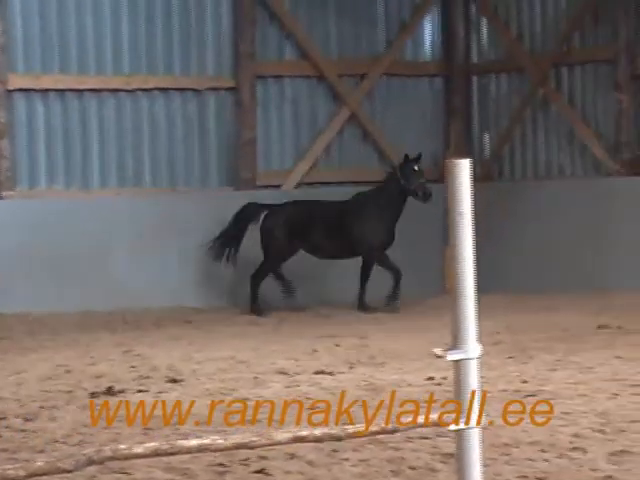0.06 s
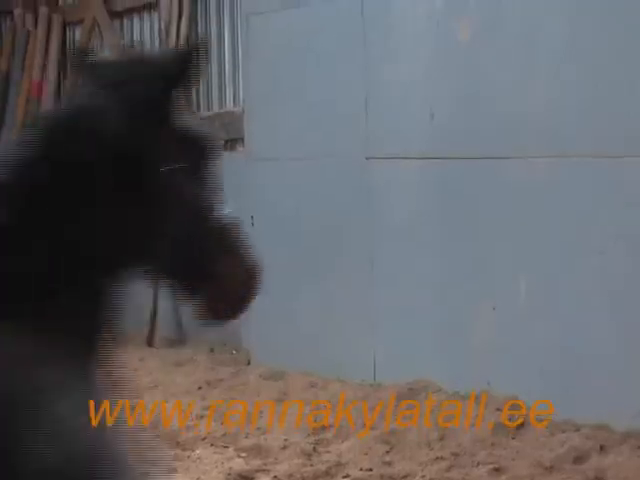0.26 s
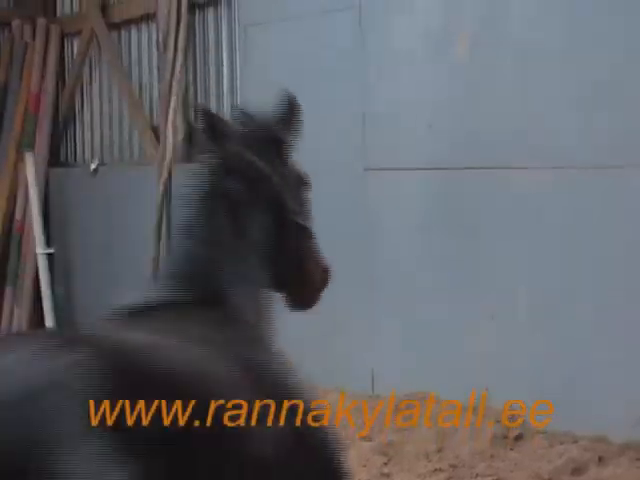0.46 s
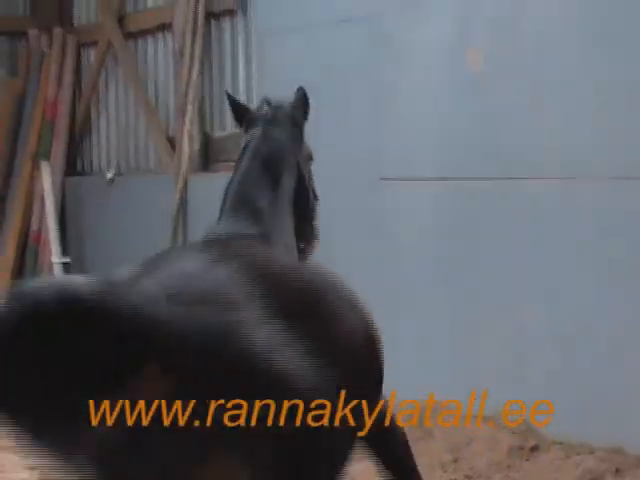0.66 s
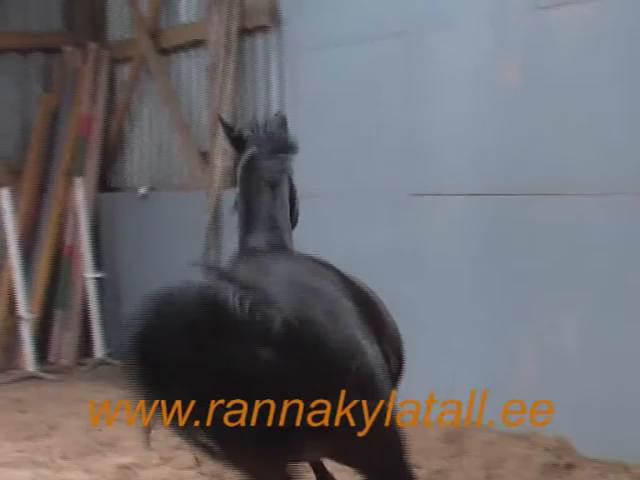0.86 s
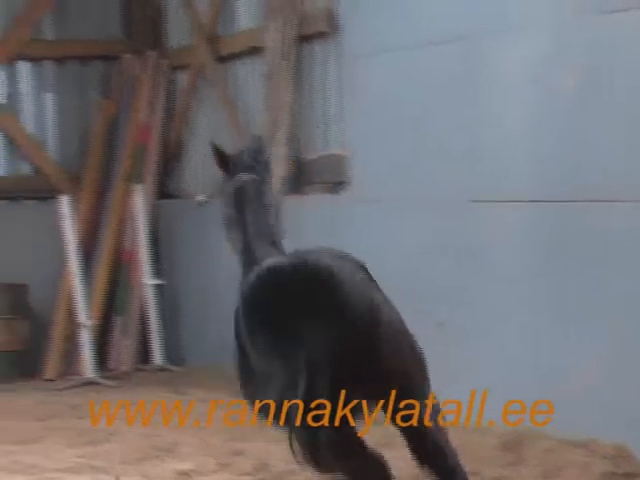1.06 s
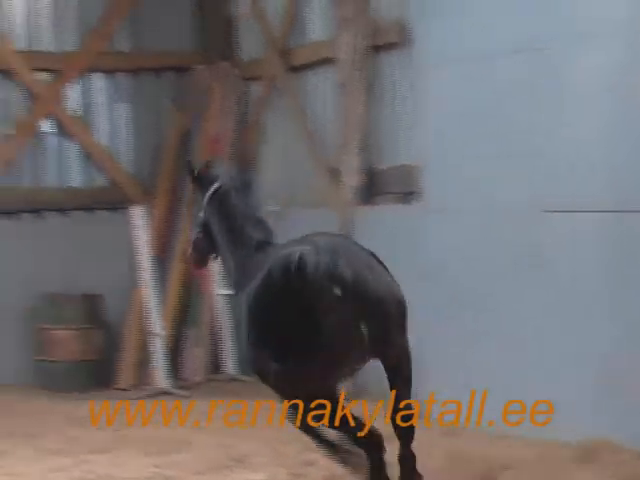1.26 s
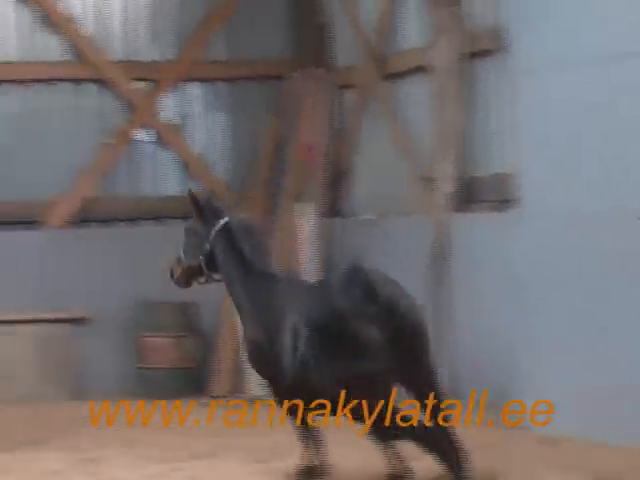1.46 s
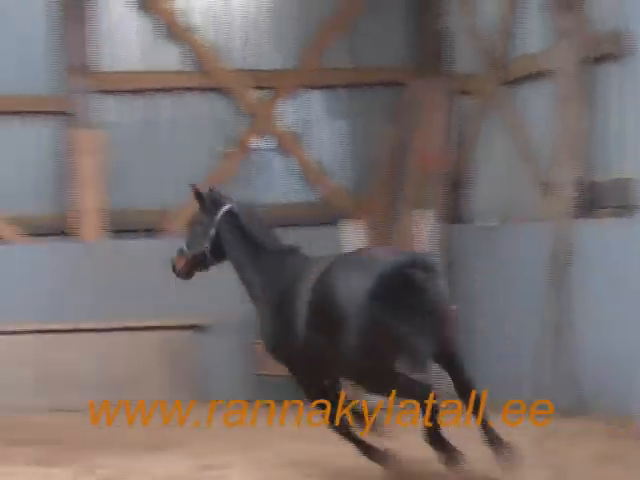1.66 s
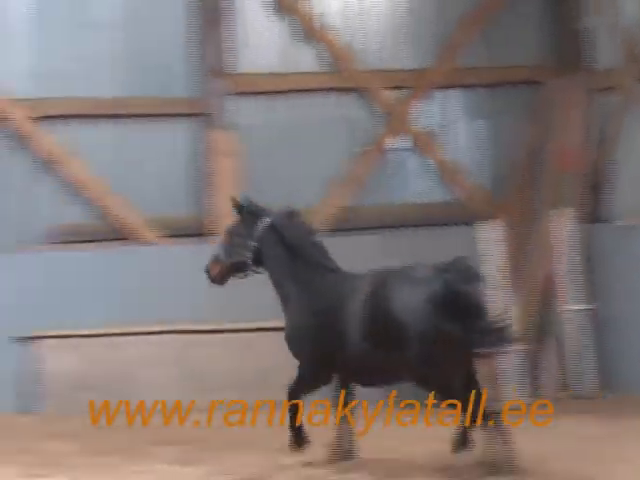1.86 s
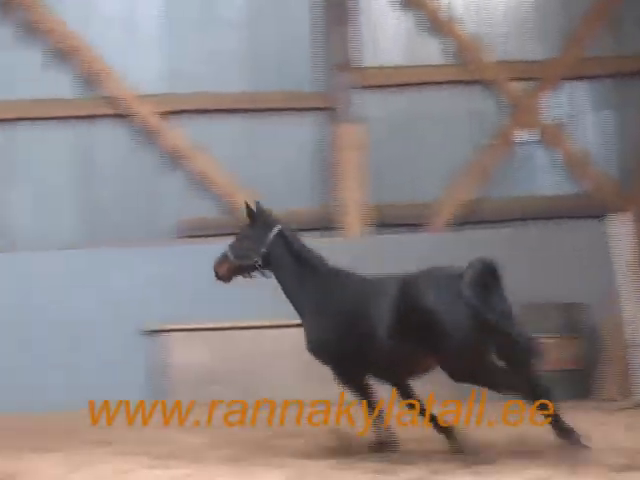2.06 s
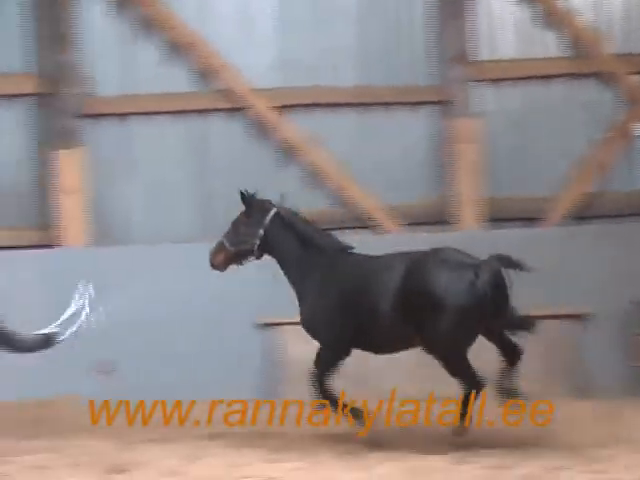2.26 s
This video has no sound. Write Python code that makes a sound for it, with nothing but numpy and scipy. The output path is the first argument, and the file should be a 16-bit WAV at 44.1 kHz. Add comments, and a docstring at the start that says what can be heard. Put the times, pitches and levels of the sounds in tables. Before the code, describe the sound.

Dull hoofbeats of a horse cantering past and away on sand in an echoing hall.

```python
"""A horse canters close by and away over the sand floor of a riding hall.
Each hoof thumps the ground, crunches into the sand and throws grit; a few knock on something hollow.
After a quiet moment the sound starts abruptly, with the horse blowing air out through its nostrils.
Thrown sand patters down, and there is one dry snap. The hall answers with a dull echo,
which makes up more of the sound as the horse moves off."""
import sys
import numpy as np
from scipy import signal
from scipy.io import wavfile

SR = 44100
rng = np.random.default_rng(int(sys.argv[2]) if len(sys.argv) > 2 else 0)


def master(y):
    """Save y as 16-bit WAV."""
    cut = np.clip(np.atleast_2d(y).T, -1, 1)
    pcm = np.round(cut * 32767)  # scale
    wavfile.write(sys.argv[1], SR, pcm.astype(np.int16))


N = 105840
TIME = np.arange(N) / SR
HIT_TIME = TIME[:SR // 3]  # the time axis of one short sound


def hoofbeats():
    """All the horse's steps, as two tracks: the ringing ground and the rustling sand."""
    # steps: t/s, boom/dB, thud/dB, thud pitch/Hz, clop/dB, crunch/dB, grit/dB, time to sink in/s
    steps = [(.005, -50.5, -63, 212, -81, -81, -77, .023), (.202, -51, -44, 317, -31.5, -30, -63, 0.018),
             (.253, -40, -37, 325, -29.5, -29, -66, 0.0046), (.332, -35, -56, 317, -48, -34, -44.5, 0.0085),
             (.347, -45, -45, 317, -28, -36, -60, 0.0016),
             (.397, -34, -28.5, 324, -19.5, -22, -45.5, 0.0045),
             (.484, -41, -25, 193, -63, -24, -39, .0081), (.509, -33, -28.5, 215, -45, -23.5, -48, 0.01),
             (.584, -34, -35, 217, -39, -32.5, -45.5, 0.005),
             (.599, -34, -36, 276, -56, -32.5, -44.5, 0.0086),
             (0.678, -50, -36, 211, -38, -34.5, -49.5, 0.022),
             (.769, -58, -41.5, 220, -44, -38.5, -49, 0.0089), (.914, -62, -39, 235, -43, -36, -65, 0.0068),
             (.939, -51, -42.5, 256, -58, -39.5, -74, 0.046),
             (.985, -38.5, -31, 249.5, -37, -29.5, -46.5, 0.011),
             (.998, -52, -37.5, 251, -42, -32, -53, 0.0042), (1.041, -37, -40, 343, -35, -39.5, -48, 0.016),
             (1.168, -36.5, -42, 213, -62, -41, -52, 0.021), (1.253, -44, -45, 332, -40.5, -42, -68, 0.01),
             (1.417, -32.5, -40, 208, -49, -33.5, -51, 0.013),
             (1.483, -37, -27.5, 206.6, -52, -34.5, -63, 0.022),
             (1.501, -23, -24, 232, -32, -34.5, -49.5, 0.01), (1.588, -29, -55, 218, -54, -50, -59, 0.045),
             (1.643, -32.5, -39.5, 305, -48, -57, -53.5, 0.0075),
             (1.672, -44, -41, 266, -46, -44.5, -68, 0.053),
             (1.755, -58, -41.5, 203, -49, -43, -62, 0.0095), (1.921, -50, -52, 210, -45, -49, -62, 0.0075),
             (1.984, -38, -32, 212.3, -42.5, -44, -58.5, 0.0043),
             (2.001, -35, -29.5, 213, -52, -37.5, -54, .025),
             (2.026, -33, -37.5, 225, -38.5, -37.5, -65, 0.059),
             (2.106, -33, -50, 242, -69, -49, -60, 0.012),
             (2.223, -50.5, -45.5, 274, -69, -59, -61, 0.0079), (2.29, -53, -48, 288, -51, -46, -52, 0.034)]
    ground, sand = np.zeros((2, N))
    for s, boom_db, thud_db, thud_hz, clop_db, crunch_db, grit_db, sink_s in steps:
        add(sand, s, amp(crunch_db) * sand_crunch(sink_s))
        add(ground, s, hoof_thump(boom_db, thud_db, thud_hz, clop_db))
        add(sand, s, amp(grit_db) * loose_grit(sink_s))
    return ground, sand


def hoof_thump(boom_db, thud_db, thud_hz, clop_db):
    """A hoof sets the ground ringing: a deep boom, a thud and a hollow clop."""
    # the ground's deep tones: f/Hz, level/dB, time to fade by 60 dB/s
    boom_tones = [(63, -15, 0.39), (98.1, 9, 0.13), (118, -19, 0.056)]
    # the thud's tones: multiple of its pitch, level/dB, time to fade by 60 dB/s
    thud_tones = [(1.001, 8.5, 0.089), (1.22, -3, 0.091)]
    # the clop's tones, retuned a little for each step: f/Hz, level/dB, time to fade by 60 dB/s
    clop_tones = [(349, 6.5, 0.068), (533, 3.5, .11), (770.4, -2, 0.08)]
    boom = ring(boom_tones, rise_s=0.0072)
    thud = ring([(thud_hz * multiple, db, fade_s) for multiple, db, fade_s in thud_tones], rise_s=0.0031)
    retuned = [(hz * (1 + .1 * rng.uniform(-1.05, 1)), db, fade_s) for hz, db, fade_s in clop_tones]
    clop = ring(retuned, rise_s=0.0034)
    return amp(boom_db) * boom + amp(thud_db) * thud - amp(clop_db) * clop


def sand_crunch(sink_s):
    """Packed sand gives way under a hoof; the quicker the landing, the harder it slaps."""
    # tone of packed sand: f/Hz, level/dB
    spectrum = [(30, -53.5), (70, 6.5), (105, -1.5), (155, -8.5), (280, -1), (420, 5.5), (1050, -1.5),
                (1500, -6.5), (2300, -11), (3800, -28.5), (8000, -41), (16000, -58)]
    crush = burst(sink_s, per_s=3500)
    slap = 1.3 * np.exp(-sink_s / 0.0083) * np.linalg.norm(crush) * (HIT_TIME == 0)
    return sized(colour(crush - slap, spectrum))


def loose_grit(sink_s):
    """Grit thrown by a hoof, brighter and longer than the crunch."""
    # tone of loose grit: f/Hz, level/dB
    spectrum = [(200, -45), (1200, -16), (2800, 7.5), (4500, 0), (6800, -5.5), (9000, -7), (12000, -17),
                (16000, -27)]
    return sized(colour(burst(sink_s * 1.9, per_s=3500), spectrum))


def hoof_knocks():
    """A hoof knocks on something hard and hollow, which rings briefly."""
    # knocks: t/s, level/dB
    knocks = [(.992, -32), (1.4199, -30), (1.4345, -37.5)]
    # the hollow thing's tones: f/Hz, level/dB, time to fade by 60 dB/s
    tones = [(530, 6.5, 0.038), (644, 2, 0.061), (1033, -1, 0.078), (1125, -7, 0.11), (1662, -10.5, 0.062)]
    track = np.zeros(N)
    for s, db in knocks:
        add(track, s, amp(db) * ring(tones, rise_s=0.0054))
    return track


def nostril_blow(length_s, db, start_hz, end_hz):
    """The horse blows through its nostrils; their two hollow tones sink as the air runs out."""
    # tone of the rushing air: f/Hz, level/dB
    spectrum = [(30, -26), (100, -9), (160, -6.5), (300, -1), (720, -0.5), (900, -17), (1100, -8),
                (2000, -23.5), (4000, -42), (9000, -60), (12000, -67), (16000, -80)]
    rise_s, release_s, sag_db = .02, 0.042, -4.5
    t = TIME[:SR // 2]
    spent = np.minimum(t / length_s, 1)
    hz = start_hz + (end_hz - start_hz) * spent
    air = evened(colour(rng.standard_normal(len(t)), spectrum))
    hollow = evened(hoot(hz) + amp(-5) * hoot(hz * 1.278))
    shape = np.minimum(t / rise_s, 1) * np.exp(-np.maximum(t - length_s, 0) / release_s)
    return shape * amp(db + sag_db * spent) * evened(hollow + amp(-1) * air)


def hoot(hz, width_hz=30):
    """Air rushing through a nostril rings as a wavering tone that follows the pitch curve hz."""
    memory = np.exp(-np.pi * width_hz / SR)
    tone = np.exp(2j * np.pi * np.cumsum(hz) / SR)
    waver = signal.lfilter([1 - memory], [1, -memory], rng.standard_normal(len(hz)) / tone)
    return evened((tone * waver / np.sqrt(abs(waver) + 1e-12)).real)  # the flow evens out the level


def sand_spray(db, length_s, tilt_db):
    """Thrown sand patters down; finer sand is brighter, and a small clod lands with one click."""
    # tone of landing sand, before it is made brighter or duller: f/Hz, level/dB
    spectrum = [(300, -32), (2000, -2.5), (3300, 3.5), (5000, 1), (7000, 1.5), (9300, 1.5), (12000, -11),
                (16000, -50)]
    tilted = [(hz, base_db + tilt_db * np.log2(hz / 6000)) for hz, base_db in spectrum]
    patter = burst(length_s, per_s=6700)
    click = 3.8 * np.exp(-length_s / 0.008) * np.linalg.norm(patter) * (HIT_TIME == 0)
    return amp(db) * sized(colour(patter + click, tilted))


def dry_snap(crack_s=0.00027):
    """A sharp, dry snap made of a few tiny cracks of noise."""
    # cracks: t/s, level/dB
    cracks = [(.822, -47), (0.8298, -42), (0.8302, -44), (0.8433, -61)]
    # tone of a crack: f/Hz, level/dB
    spectrum = [(1200, -16), (3000, 0), (5000, 0), (10000, -7.5), (15000, -34)]
    track = np.zeros(N)
    for s, db in cracks:
        noise = rng.standard_normal(len(HIT_TIME)) * np.exp(-HIT_TIME / crack_s)
        add(track, s, amp(db) * sized(colour(noise, spectrum)))
    return track


def hall_echo(horse, change_s=.45):
    """The hall's echoes; as the horse moves, two patterns take turns, one every change_s."""
    # the long echo's share grows as the horse moves off: t/s, level/dB
    share = [(.2, -6), (1.0, 2), (2.4, 6)]
    turn = np.pi * TIME / change_s / 2
    echo = np.zeros(N)
    for blend in (np.sin(turn), np.cos(turn)):
        echo += signal.fftconvolve(horse * blend, quick_echo())[:N]
        echo += signal.fftconvolve(horse * blend * level(share), long_echo())[:N]
    return echo


def quick_echo(peak_s=0.0055):
    """How a click bounces back from the near wall and the floor."""
    echo = bounces(len(HIT_TIME), spacing=40) * HIT_TIME * np.exp(-HIT_TIME / peak_s)
    return amp(-7.5) * echo / np.linalg.norm(echo)


def long_echo(rise_s=0.002):
    """How a click lingers in the hall, each pitch dying at its own speed."""
    # how long the hall rings: f/Hz, time to fade by 60 dB/s
    fade_times = [(60, 0.95), (100, 0.57), (200, 0.94), (500, 1), (1200, 0.89), (3000, 1.4), (8000, 1.77),
                  (15000, 0.97)]
    # tone of the long echo: f/Hz, level/dB
    spectrum = [(50, -0.5), (96, -2.5), (135, -12), (165, -1), (215, -1.5), (300, -7), (500, 0),
                (1500, 2.5), (4000, -6), (9000, -9), (15000, -1)]
    hz, t, bands = signal.stft(bounces(SR * 3 // 2, spacing=12), SR, nperseg=512)
    echo = signal.istft(bands * amp(-60 * t / read(fade_times, hz)[:, None]), SR)[1]
    echo *= 1 - np.exp(-np.arange(len(echo)) / SR / rise_s)
    return colour(echo / np.linalg.norm(echo), spectrum)


def sand_trickle(start_s=.202):
    """A low, grainy rustle of sand starts abruptly and carries on."""
    # tone of trickling sand: f/Hz, level/dB
    spectrum = [(30, -30), (60, 0.5), (92, 11.5), (150, 7.5), (220, 4.5), (500, 2), (2000, -14),
                (4000, -19.5), (7000, -26.5), (9000, -27), (12000, -33), (16000, -66)]
    # how loud it trickles: t/s, level/dB
    loudness = [(.2, -35), (.6, -40.5), (1.1, -42), (1.38, -46), (1.6, -40), (1.82, -46.5), (2.15, -40),
                (2.4, -48)]
    return evened(colour(grains(N, per_s=9000), spectrum)) * level(loudness) * (TIME > start_s)


def still_air():
    """The faint, steady hush of the air in the hall."""
    # tone of the hush: f/Hz, level/dB
    spectrum = [(18, -71), (32, -4), (117, -2), (639, -4), (1080, -8.5),
                (4910, -22.5), (6720, -25), (7860, -19), (9190, -28), (15500, -38)]
    return amp(-53) * evened(colour(rng.standard_normal(N), spectrum))


def surroundings(horse):
    """The sound that comes from all around: echoes, trickling sand and still air."""
    return hall_echo(horse) + sand_trickle() + still_air()


def ring(tones, rise_s):
    """A struck thing rings with a few tones that start softly and die away."""
    t = HIT_TIME
    ringing = sum(amp(db - 60 * t / fade_s) * np.sin(2 * np.pi * hz * t) for hz, db, fade_s in tones)
    return sized((1 - np.exp(-t / rise_s)) * ringing)


def grains(count, per_s, spread_db=5):
    """Sand grains: random clicks of uneven size."""
    size = amp(spread_db * np.minimum(rng.exponential(1, count), 3))
    return evened(size * rng.choice([-1, 1], count) * (rng.random(count) < per_s / SR))


def burst(length_s, per_s):
    """A cloud of grains that swells quickly and dies."""
    swell = 1 - np.exp(-HIT_TIME / (0.062 * length_s))
    return grains(len(HIT_TIME), per_s) * swell * np.exp(-HIT_TIME / length_s)


def bounces(count, spacing):
    """Scattered echoes: one click of random sign and place in every `spacing` samples."""
    clicks = np.zeros(count)
    slots = np.arange(0, count - spacing, spacing)
    clicks[slots + rng.integers(0, spacing, len(slots))] = rng.choice([-1., 1.], len(slots))
    return clicks


def colour(x, points, size=4096):
    """Gives a sound the tone drawn by (f/Hz, level/dB) points, without ringing ahead of a hit."""
    log_gain = np.log(amp(read(points, abs(np.fft.fftfreq(size, 1 / SR)))))
    response = np.exp(np.conj(signal.hilbert(log_gain)))
    taps = np.fft.ifft(response).real[:size // 2]
    return signal.fftconvolve(x, taps)[:len(x)]


def amp(db):
    """Turns decibels into a factor to multiply by."""
    return 10 ** (np.asarray(db) / 20)


def evened(x):
    """Scales a sound to an average strength (rms) of 1."""
    return x / np.sqrt(np.mean(x ** 2) + 1e-20)


def sized(x):
    """Scales a hit to the energy of 20 ms of sound at strength 1."""
    return x / np.sqrt(np.sum(x ** 2) / (.02 * SR) + 1e-20)


def read(points, hz):
    """Reads between (f/Hz, value) points, with octaves evenly spaced."""
    f, value = np.transpose(points)
    return np.interp(np.log(hz + 1), np.log(f), value)


def level(points):
    """A volume curve through (t/s, level/dB) points."""
    return amp(np.interp(TIME, *np.transpose(points)))


def add(mix, s, sound):
    """Mixes a sound in, starting at s seconds."""
    part = mix[max(round(s * SR), 0):][:len(sound)]
    part += sound[:len(part)]


def scene():
    """The horse straight ahead and the hall all around, in stereo."""
    # thrown sand and small clods landing: t/s, level/dB, length/s, brightness/(dB per octave)
    sprays = [(0.2236, -55, .0034, 15), (0.234, -42.5, 0.005, -1.5), (0.257, -55, .001, -1),
              (0.346, -55, .001, -4), (.376, -51, 0.0024, -10), (.672, -50, .0088, -3.5),
              (1.071, -53, 0.0082, 4.5), (1.181, -51, 0.00096, 2), (1.21, -59, .001, -4),
              (1.239, -54.5, .0011, 0), (1.501, -61, 0.011, 14), (1.641, -55, 0.0031, -6),
              (1.854, -58, 0.0015, 7), (1.86, -54.5, 0.014, 0)]
    # the horse blows out: t/s, length/s, level/dB, starting pitch/Hz, final pitch/Hz
    blows = [(0.202, .19, -25.5, 505, 377.5), (.795, 0.04, -39.5, 530, 512)]
    # stereo width, the sides against the middle: f/Hz, level/dB
    width = [(25, 7), (60, -22), (120, -24), (250, -21.5), (500, -15), (1000, -12.5), (2000, -10),
             (4000, -10), (8000, -6.5), (14000, -2.5)]
    ground, rustle = hoofbeats()
    knocks = hoof_knocks()
    for s, *handful in sprays:
        add(rustle, s, sand_spray(*handful))
    rustle += dry_snap()
    for s, *puff in blows:
        add(rustle, s, nostril_blow(*puff))
    to_hall = rustle + amp(-2) * ground + amp(-9) * knocks  # these two feed the hall less than sand does
    middle = ground + knocks + rustle + surroundings(to_hall)
    side = surroundings(to_hall) + amp(-1) * signal.fftconvolve(to_hall, quick_echo())[:N]
    side = colour(side, width)
    return np.array([middle + side, middle - side])


def record(dry, low_hz=42, high_hz=15400):
    """Trims away the deepest bass and the highest treble."""
    thinned = signal.sosfilt(signal.butter(2, low_hz, "highpass", fs=SR, output="sos"), dry)
    treble_cut = signal.firwin(255, high_hz, window=("kaiser", 9), fs=SR)
    return signal.oaconvolve(thinned, treble_cut[None], "same")


dry = scene()
out = record(dry)
master(out)
```